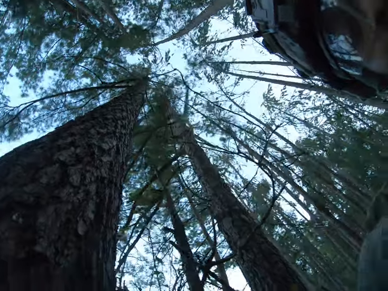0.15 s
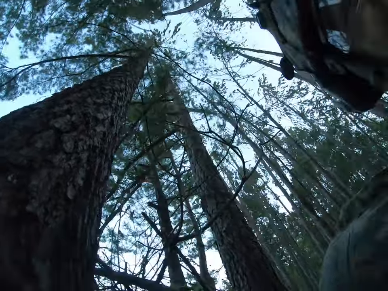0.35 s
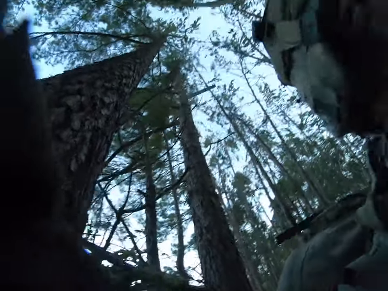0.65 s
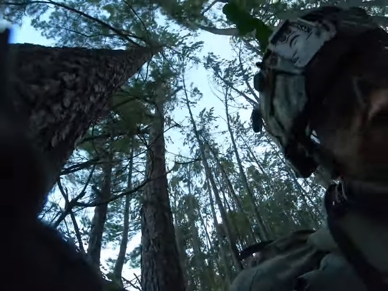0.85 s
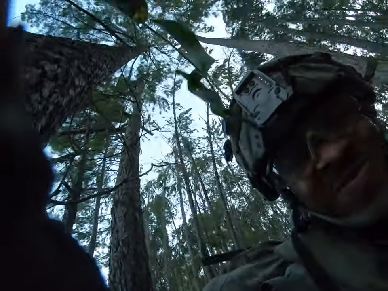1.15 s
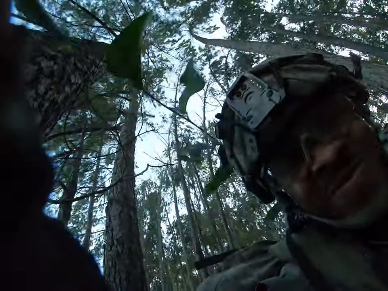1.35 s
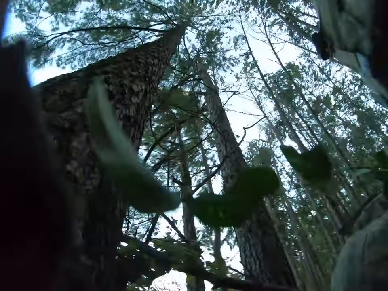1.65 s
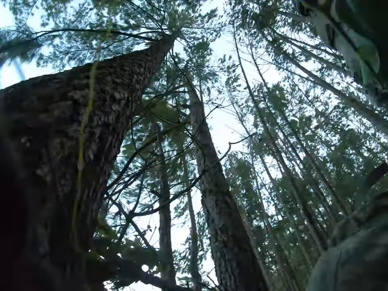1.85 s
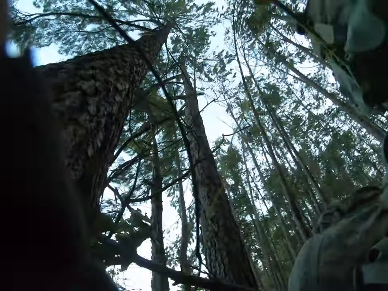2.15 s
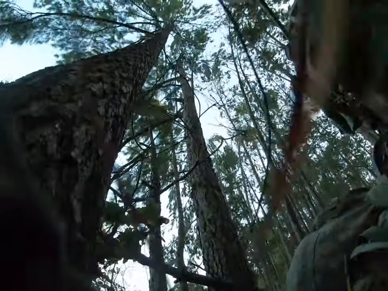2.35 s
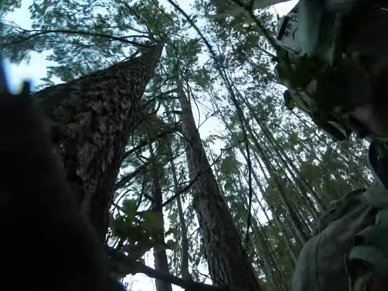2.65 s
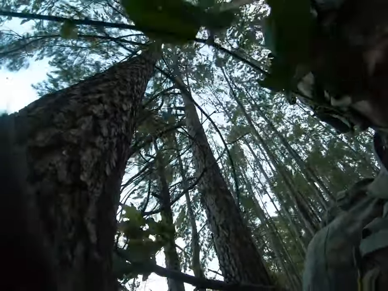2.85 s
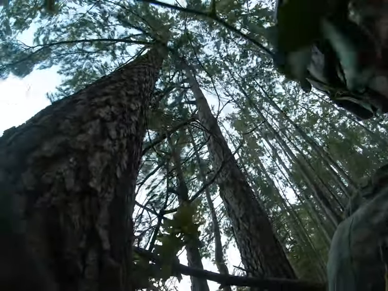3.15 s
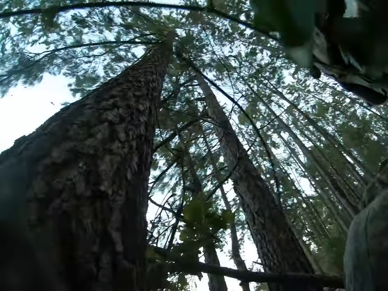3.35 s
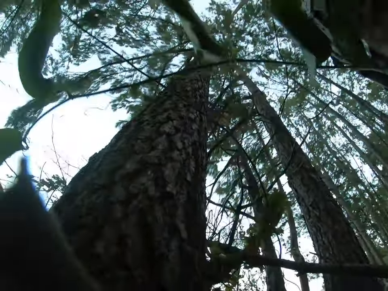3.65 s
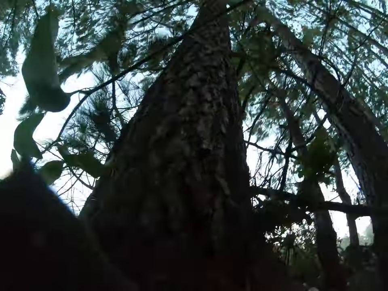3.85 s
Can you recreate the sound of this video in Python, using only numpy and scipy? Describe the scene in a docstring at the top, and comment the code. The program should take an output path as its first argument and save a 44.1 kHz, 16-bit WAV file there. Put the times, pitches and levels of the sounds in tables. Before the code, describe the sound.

A heavy helicopter hovers overhead, rotor blades thudding fast as downwash roars through the trees.

```python
"""Heavy helicopter hovering over a pine wood

Heard from the ground, fading in quickly. The blades of two rotors push and slap the air, eleven slaps
a second, over gearbox and turbine whine. The downwash buffets the microphone, roars through the
crowns and snaps twigs. A limiter ducks everything after each loud slap."""
import sys
import numpy as np
from scipy import signal
from scipy.fft import rfft, irfft
from scipy.io import wavfile
from scipy.ndimage import uniform_filter1d, minimum_filter1d

SR = 44100
rng = np.random.default_rng(int(sys.argv[2]) if len(sys.argv) > 2 else 0)


def bounce(signal):
    """Save signal as a 16-bit WAV file at the path given by the first command-line argument."""
    frames = np.transpose(np.atleast_2d(signal))
    limited = np.clip(frames, -1, 1)
    pcm = np.round(limited * 32767).astype(np.int16)
    wavfile.write(sys.argv[1], SR, pcm)


N = 176400

TIME = np.arange(N) / SR

# Blade passes: t/s, rate/Hz
BLADE_RATE = [(.3, 11.272), (1.05, 11.26), (1.8, 11.24), (4, 11.237)]
# Main slap: t/s, relative level/dB
SLAP_LEVEL = [(.3, 5), (.8, 4), (1.2, 2), (1.8, 4), (2.0, 0.5), (2.45, -8), (2.7, -8), (2.95, -14.5),
              (3.2, 0.5), (3.75, -7.5), (4, -5)]
# Lesser slap ahead of it: t/s, relative level/dB
EARLY_LEVEL = [(.3, -28), (.9, -21), (1.2, -17), (1.75, -8), (2, -13), (4, -21)]
# Torn air at the slap: t/s, relative level/dB
RASP_LEVEL = [(.3, -12), (.4, -7), (.7, -16.5), (.95, -11), (1.2, -25), (1.8, -20.5), (2.6, -31),
              (3.3, -15.5), (4, -31)]
# Its spectrum: f/Hz, level/dB
RASP_SPECTRUM = [(100, -19), (400, -3.5), (700, 1), (1400, -7.5), (2200, -9.5), (5000, -30), (15000, -86)]
# Downwash rumble: t/s, relative level/dB
RUMBLE_LEVEL = [(.3, -17.5), (.7, -17.5), (1.0, -23), (1.4, -21), (1.8, -19.5), (2.2, -16.5), (2.6, -21.5),
                (3.1, -23), (3.501, -18), (3.8, -26.5), (4, -19.5)]
# Its spectrum: f/Hz, level/dB
RUMBLE_SPECTRUM = [(8, -20), (20, -19), (35, -7), (60, 3.5), (105, 0.5), (150, -7.5), (220, -15),
                   (400, -37), (2000, -100)]
# Gusts at the microphone: t/s, relative level/dB
GUST_LEVEL = [(.3, -16.5), (.55, -18), (.7, -25), (1.1, -21.5), (1.248, -16), (1.5, -20), (1.8, -16),
              (1.92, -17.5), (2.35, -17), (2.58, -27), (2.901, -23.5), (3.1, -35.5), (3.25, -18.5),
              (3.5, -20), (3.75, -30), (4, -21.5)]
# Their spectrum: f/Hz, level/dB
GUST_SPECTRUM = [(40, -17), (100, -5.5), (160, 0), (250, -2), (350, -5.5), (480, -13), (700, -15.5),
                 (1200, -26), (3000, -32.5), (12000, -86)]
# Roar in the crowns: t/s, relative level/dB
ROAR_LEVEL = [(0.298, -24.5), (.65, -28.5), (1.0, -26), (1.2, -29.5), (1.45, -30), (1.6, -30),
              (1.95, -24.5), (2.2, -28), (2.6, -34.5), (3.0, -30.5), (3.4, -33), (3.65, -32), (3.88, -32.5),
              (4, -29.5)]
# Its spectrum: f/Hz, level/dB
ROAR_SPECTRUM = [(150, -12), (400, 2), (700, 3), (1000, -0.5), (1500, -4.5), (2200, -10), (3500, -31),
                 (6000, -37), (10000, -51.5), (16000, -76.5)]
# Hiss of needles and leaves: t/s, relative level/dB
HISS_LEVEL = [(.3, -30.5), (.75, -30), (1.15, -33), (1.35, -39), (1.8, -38), (1.95, -34.5), (2.3, -35),
              (2.5, -41), (2.9, -36), (3.15, -36), (3.3, -33), (3.55, -34.5), (3.75, -38.5), (4, -39)]
# Its spectrum: f/Hz, level/dB
HISS_SPECTRUM = [(600, -29.5), (1500, -4.5), (2400, 2), (3700, 1.5), (4100, -3), (4900, -5), (5600, -16.5),
                 (6200, -24.5), (7000, -22), (7900, -18), (8800, -29), (9600, -27.5), (10700, -46.5),
                 (11500, -41), (12500, -45), (15500, -65)]
# Spray of grit: t/s, relative level/dB
SPRAY_LEVEL = [(0.301, -34.5), (.55, -41), (.7, -49), (1.2, -45), (1.4, -47.5), (1.7, -47.5), (1.9, -42),
               (2.1, -43.5), (2.25, -51), (2.401, -47), (2.6, -55), (2.9, -48), (3.5, -51.5), (4, -47.5)]
# Its spectrum: f/Hz, level/dB
SPRAY_SPECTRUM = [(100, -70), (2000, -16.5), (4000, -4), (5300, 3.5), (6400, -9.5), (8000, -5.5),
                  (9500, -16.5), (10700, -29.5), (11600, -24), (13000, -37), (15500, -43.5)]
# Eddies at the microphone: t/s, f/Hz, level/dB
EDDIES = [(0.299, 110, -26), (0.552, 339.8, -20.5), (.68, 129.2, -13), (0.823, 70.1, -19), (1.1, 330, -36),
          (1.3, 319, -30.5), (1.75, 375, -44), (1.951, 286.3, -19), (2.06, 184.8, -18), (2.218, 139.3, -16),
          (2.351, 85.8, -12), (2.502, 45.55, -39), (2.75, 55, -16), (2.871, 78.6, -20.5),
          (2.968, 135.3, -14.5), (3.101, 94.4, -16.5), (3.3, 200.5, -29), (3.498, 140, -16),
          (3.678, 50, -29), (3.85, 100.3, -26), (4, 206.4, -21)]
# Twig snaps, and wind buffet bursts at 0.36, 1.94, 2.16 and 3.95 s: t/s, level/dB, centre f/Hz, width/octaves,
# relative rattle level/dB, rattle decay/s
SNAPS_AND_BURSTS = [(0.3612, -8, 780, 0.51, -13, 0.0055), (1.9382, -12.5, 1600, .6, -1, 0.0014),
                    (2.159, -12, 1041, 0.73, 1.5, 0.0019), (2.1773, -16.5, 3370, 0.26, -4, 0.0019),
                    (2.288, -24.5, 3600, 0.43, -0.5, 0.0026), (2.5754, -19, 3437, 0.26, -8, 0.00077),
                    (2.6458, -20.5, 6760, 0.27, -1, 0.00019), (3.2566, -5, 2130, 0.64, -11, 0.0013),
                    (3.9509, -9, 1232, 0.49, -9.5, 0.00083)]
# Gearbox harmonics, from the first up: half-width/Hz, level/dB
GEAR_HARMONICS = [(40, -42.5), (60, -47), (60, -52.5)]
# Engine whine: t/s, gain/dB
WHINE_GAIN = [(.3, 11), (.8, 2.5), (1.4, 2), (2.0, -7), (4, -4.5)]


def blade_slap(t, stretch):
    """Steep pressure front, suction dip, then overshoot."""
    crack_lead_s, crack_s = 0.0017, 0.00039
    rebound_db, rebound_lag_s, rebound_s = -4, 0.0041, 0.0014
    crack = -amp(-8) / 2 * suction(t / stretch + crack_lead_s, crack_s, crack_s)
    dip = suction(t / stretch, rise_s=0.00067, fall_s=0.0012)
    rebound = amp(rebound_db) * np.exp(-((t - rebound_lag_s) / rebound_s) ** 2 / 2)
    return crack + dip + rebound


def rotors(passes):
    """Per pass: soft pushes from the rear and front rotors, a lesser slap, the main slap."""
    rear_lead_s, front_lead_s, early_lead_s, jitter_s = 0.0435, 0.00856, 0.01524, 0.0012
    out = np.zeros(N + SR)
    t = np.arange(-3300, 1000) / SR
    for slap_s in np.interp(np.arange(int(passes[-1]) + 1), passes, TIME):
        gains = amp(rng.normal(0, 1.4, 4))
        slap_stretch, front_stretch = np.exp(rng.normal(0, 0.1, 2))
        slap_db = curve(SLAP_LEVEL, slap_s)
        push_db = 0.23 * slap_db
        slap = amp(slap_db) * blade_slap(t, slap_stretch)
        early_t = t + rng.normal(early_lead_s, jitter_s)
        early = -amp(curve(EARLY_LEVEL, slap_s)) * swing(early_t, rise_s=0.0013, fall_s=0.0013)
        front_t = (t + front_lead_s) / front_stretch
        front = amp(push_db - 6.5) * suction(front_t, rise_s=0.0038, fall_s=0.0021)
        rear = amp(push_db - 13) * swing(t + rear_lead_s, rise_s=0.0028, fall_s=0.0021)
        add(out, slap_s + t[0], gains @ np.array([slap, early, front, rear]))
    dc_block = signal.butter(1, 5, "highpass", fs=SR)
    return signal.lfilter(*dc_block, out[:N])


def vortex_rasp(passes, lead_s=0.0022, width_s=0.00071):
    """A puff of noise as each blade cuts a tip vortex."""
    rate_hz = curve(BLADE_RATE)
    from_puff_s = ((passes + lead_s * rate_hz + 0.5) % 1 - 0.5) / rate_hz
    puffs = np.exp(-(from_puff_s / width_s) ** 2 / 2)
    return colour(rng.standard_normal(N), RASP_SPECTRUM) * amp(curve(RASP_LEVEL)) * puffs


def downwash(passes):
    """Rumble and gusts at the microphone, roar and hiss in the trees, blown grit."""
    rumble = turbulence(RUMBLE_SPECTRUM, RUMBLE_LEVEL, passes, gain_db=2,
                        swish_db=-5, lead_passes=0.071, lumps_db=2.5, lumps_hz=6.3)
    gusts = turbulence(GUST_SPECTRUM, GUST_LEVEL, passes, gain_db=2,
                       swish_db=0.5, lead_passes=0.22, lumps_db=3, lumps_hz=38.5)
    roar = turbulence(ROAR_SPECTRUM, ROAR_LEVEL, passes, gain_db=2.5,
                      swish_db=-0.5, lead_passes=0.3, lumps_db=1.5, lumps_hz=110)
    hiss = turbulence(HISS_SPECTRUM, HISS_LEVEL, passes, gain_db=1.5,
                      swish_db=-0.5, lead_passes=0.19, lumps_db=0, lumps_hz=50)
    spray = turbulence(SPRAY_SPECTRUM, SPRAY_LEVEL, passes, gain_db=0,
                       swish_db=-1, lead_passes=0.21, lumps_db=2, lumps_hz=150)
    return rumble + gusts + roar + hiss + spray


def turbulence(spectrum, level, passes, gain_db, swish_db, lead_passes, lumps_db, lumps_hz):
    """Lumpy noise that swells before each slap, or dips if swish_db < 0."""
    swish = np.cos(2 * np.pi * (passes + lead_passes))
    swell = amp(swish_db * swish + lumps_db * drift(lumps_hz))
    noise = colour(rng.standard_normal(N), spectrum)
    return amp(curve(level) + gain_db) * unit(noise * swell)


def eddies(wander=0.32, wander_hz=70.34):
    """Eddies shed at the microphone: a rough flutter of gliding pitch."""
    times_s, hz, db = np.transpose(EDDIES)
    pitch_hz = np.exp(np.interp(TIME, times_s, np.log(hz)) + wander * drift(wander_hz))
    flutter = np.sin(2 * np.pi * np.cumsum(pitch_hz) / SR)
    return amp(np.interp(TIME, times_s, db)) * unit(flutter)


def engines(gear_hz=1925, turbine_hz=7480):
    """Gearbox whine with a turbine whistle above it."""
    whine_db = curve(WHINE_GAIN)
    gears = sum(amp(db) * whistle(k * gear_hz, half_width_hz)
                for k, (half_width_hz, db) in enumerate(GEAR_HARMONICS, 1))
    turbine = whistle(turbine_hz, half_width_hz=50)
    return amp(whine_db) * gears + amp(0.76 * whine_db - 54) * turbine


def needle_patter(ticks_per_s=61, spread_db=10, gain_db=-15.5):
    """Blown needles tick at random, following the hiss level."""
    ticks = (rng.random(N) < ticks_per_s / SR) * rng.choice([-1, 1], N)
    sizes = amp(spread_db * np.minimum(rng.exponential(1, N), 3))
    return colour(ticks * sizes, HISS_SPECTRUM) * amp(curve(HISS_LEVEL) + gain_db)


def cracks():
    """Twigs snap and the wind buffets in bursts: a sharp crack and a short rattle in the same band."""
    out = np.zeros(N)
    t = np.arange(-256, 1792) / SR
    f = np.fft.rfftfreq(len(t), 1 / SR)
    impulse = 1.0 * (t == 0)
    for snap_s, db, centre_hz, octaves, rattle_db, decay_s in SNAPS_AND_BURSTS:
        band = np.exp(-(np.log2((f + 1) / centre_hz) / octaves) ** 2 / 2)
        crack = irfft(rfft(impulse) * band * -1j)  # 90 degree phase shift
        noise = unit(irfft(rfft(rng.standard_normal(len(t))) * band))
        age = np.maximum(t, 0) / decay_s
        rattle = 0.5 * noise * age * np.exp(1 - age)
        add(out, snap_s + t[0], amp(db) * (crack / crack.max() + amp(rattle_db) * rattle))
    return out


def blade_passes(first_slap_s=0.3061):
    """Running pass count; an integer at each slap."""
    passes = np.cumsum(curve(BLADE_RATE)) / SR
    return passes - np.interp(first_slap_s, TIME, passes)


def suction(t, rise_s, fall_s):
    """A passing blade: a dip in pressure between two shoulders."""
    u = t / np.where(t < 0, rise_s, fall_s)
    return (u ** 2 - 1) * np.exp(-u ** 2 / 2)


def swing(t, rise_s, fall_s):
    """One swing of pressure, down and then up; peak 1."""
    u = t / np.where(t < 0, rise_s, fall_s)
    return u * np.exp((1 - u ** 2) / 2)


def whistle(centre_hz, half_width_hz):
    """Narrowband noise; rms 1."""
    f = np.fft.rfftfreq(N, 1 / SR)
    band = 1 / (1 + ((f - centre_hz) / half_width_hz) ** 2)
    return unit(irfft(rfft(rng.standard_normal(N)) * band, N))


def amp(db):
    """Decibels to gain."""
    return 10 ** (np.asarray(db) / 20)


def unit(x):
    """Scales to rms 1."""
    return x / np.sqrt(np.mean(x ** 2) + 1e-20)


def curve(points, t=TIME):
    """Reads a table of (s, value)."""
    return np.interp(t, *np.transpose(points))


def add(mix, s, sound):
    """Mixes a sound in at time s."""
    part = mix[max(round(s * SR), 0):][:len(sound)]
    part += sound[:len(part)]


def colour(x, spectrum):
    """Filters by a table of (Hz, dB); rms 1."""
    hz, db = np.transpose(spectrum)
    f = np.fft.rfftfreq(N, 1 / SR)
    return unit(irfft(rfft(x) * amp(np.interp(np.log(f + 1), np.log(hz), db)), N))


def drift(rate_hz):
    """Smooth chance up to a rate; rms 1."""
    f = np.fft.rfftfreq(N, 1 / SR)
    return unit(irfft(rfft(rng.standard_normal(N)) * (f > 2) / (1 + (f / rate_hz) ** 4), N))


def scene():
    """Rotors, wind, engines and debris; mono."""
    passes = blade_passes()
    blades = rotors(passes) + vortex_rasp(passes)
    wind = downwash(passes) + eddies()
    return (blades + wind + engines() + needle_patter() + cracks())[None]


def record(dry):
    """Look-ahead limiter, fade-in, low-pass."""
    threshold_db, slope, release_db_per_s, look_ahead_s = -6.5, 0.67, 131, 0.0023
    fade_start_s, fade_s, cutoff_hz = 0.22, 0.068, 15700
    over_db = np.maximum(20 * np.log10(abs(dry[0]) + 1e-9) - threshold_db, 0)
    release_db = TIME * release_db_per_s
    held_db = np.maximum.accumulate(over_db + release_db) - release_db
    ahead = round(look_ahead_s * SR)
    duck_db = slope * uniform_filter1d(minimum_filter1d(-held_db, 2 * ahead), ahead)
    fade = np.clip((TIME - fade_start_s) / fade_s, 0, 1) ** 2
    lowpass = signal.firwin(511, cutoff_hz, window=("kaiser", 9), fs=SR)
    return signal.oaconvolve(dry * amp(duck_db) * fade, lowpass[None], "same")


dry = scene()
out = record(dry)
bounce(out)
```